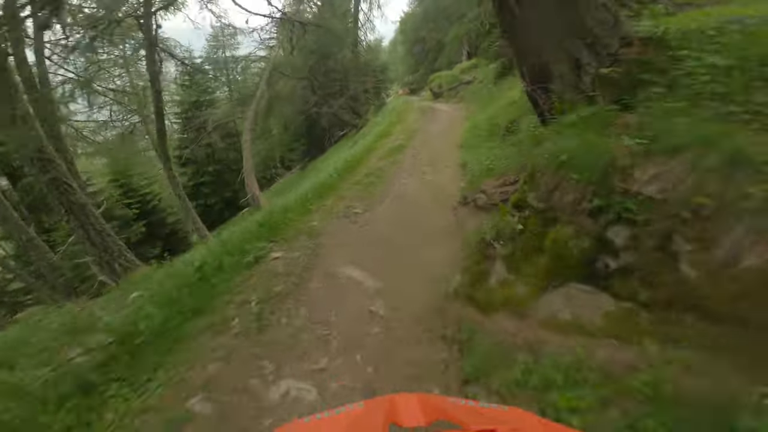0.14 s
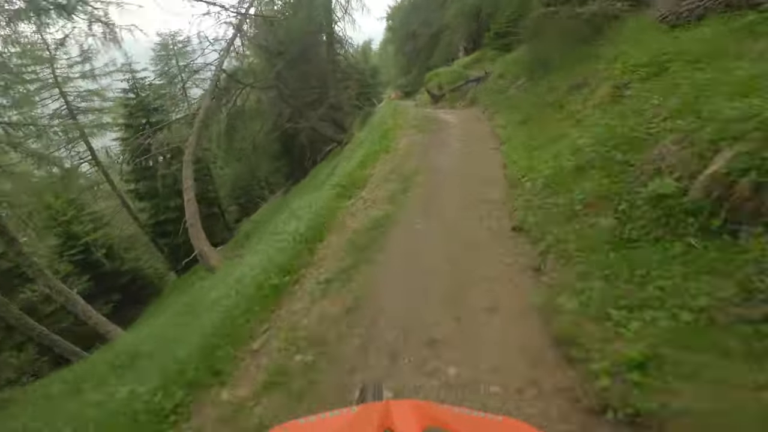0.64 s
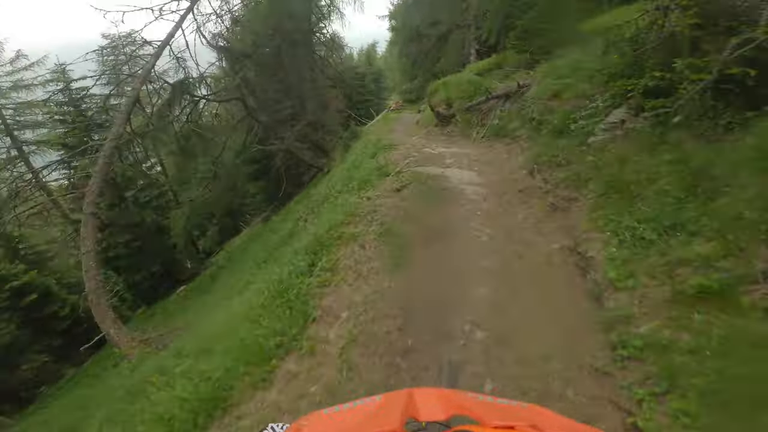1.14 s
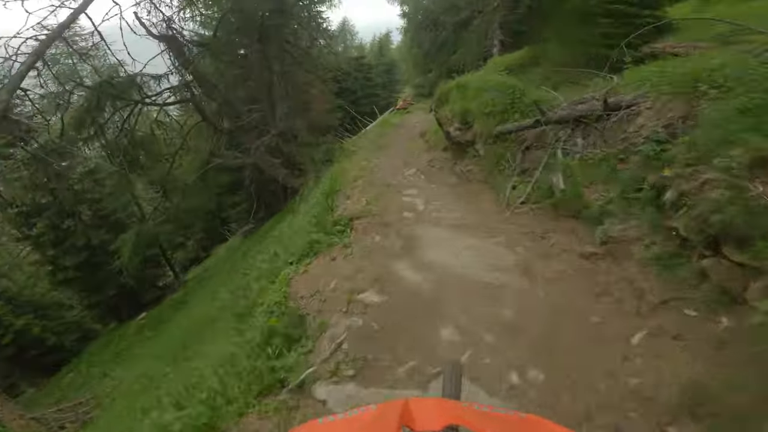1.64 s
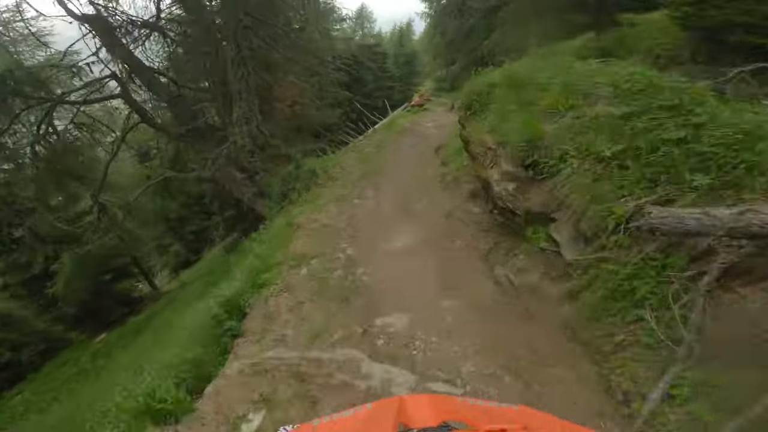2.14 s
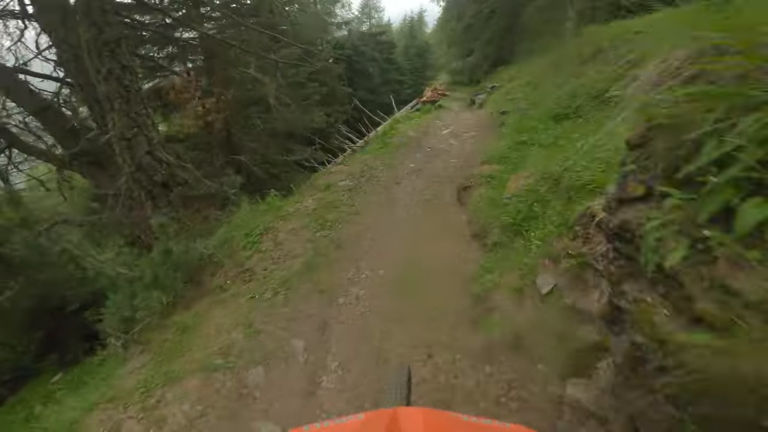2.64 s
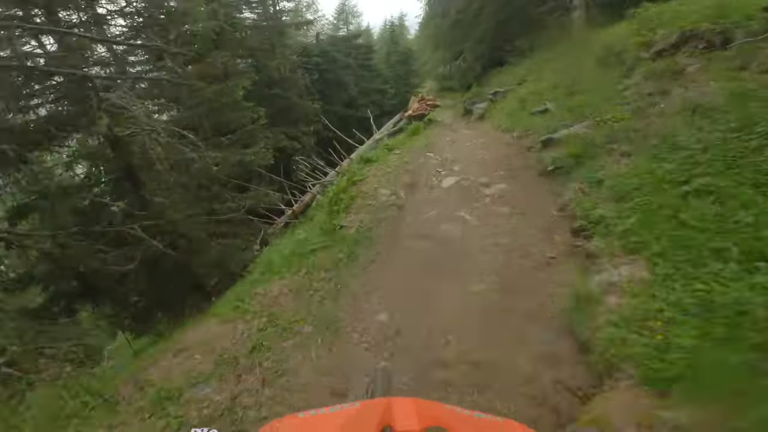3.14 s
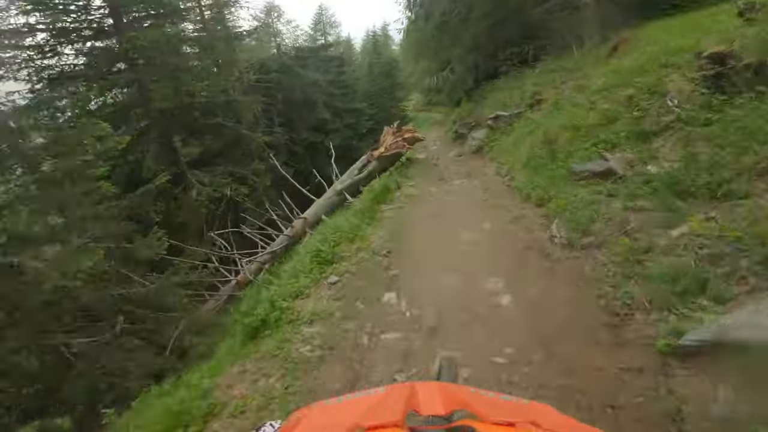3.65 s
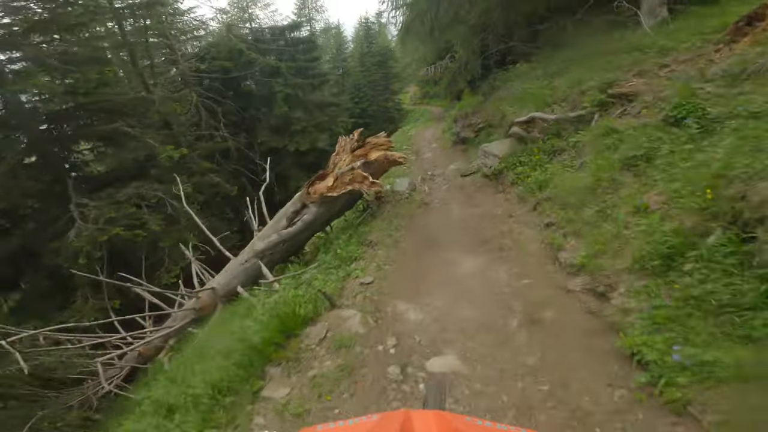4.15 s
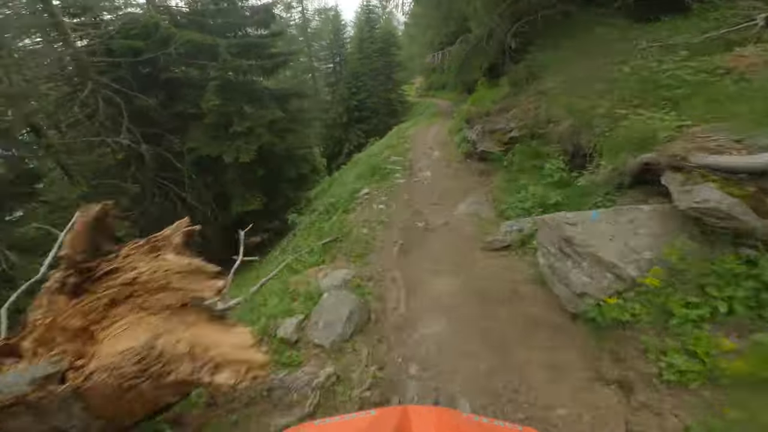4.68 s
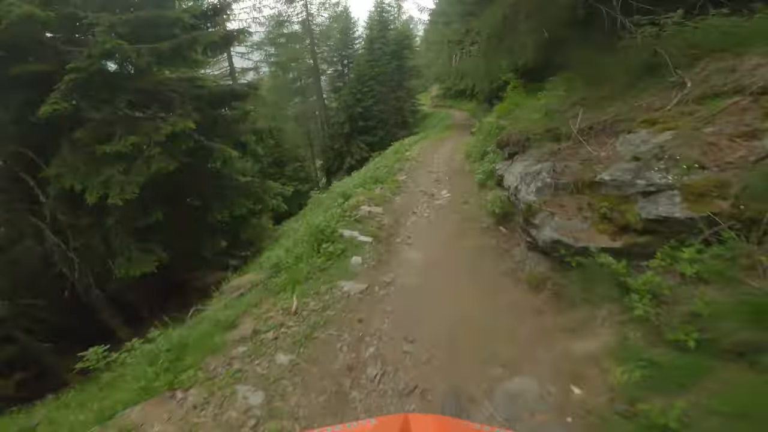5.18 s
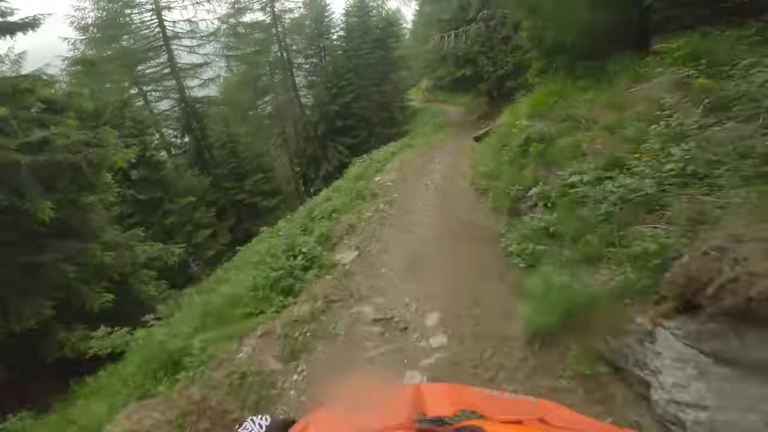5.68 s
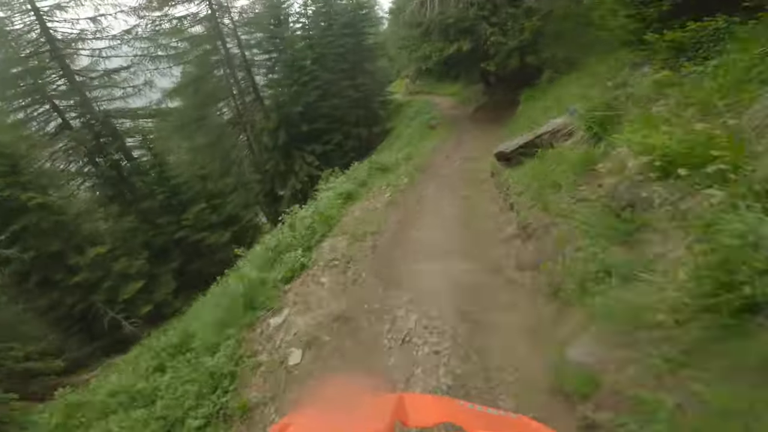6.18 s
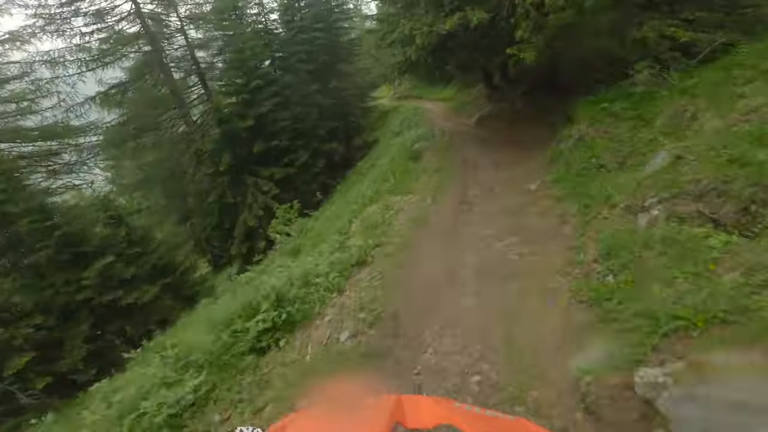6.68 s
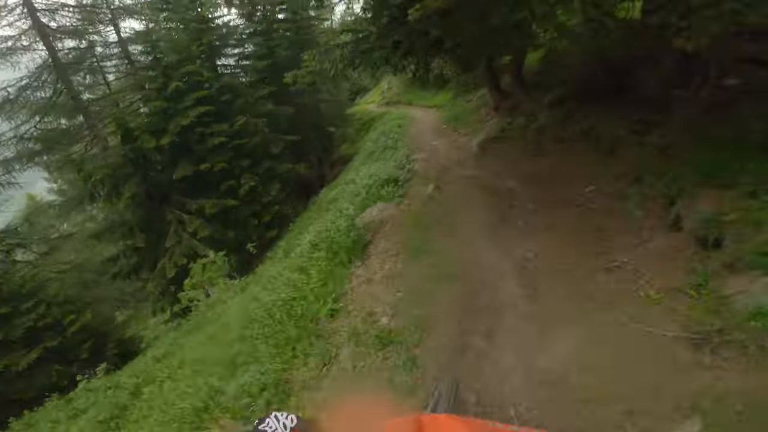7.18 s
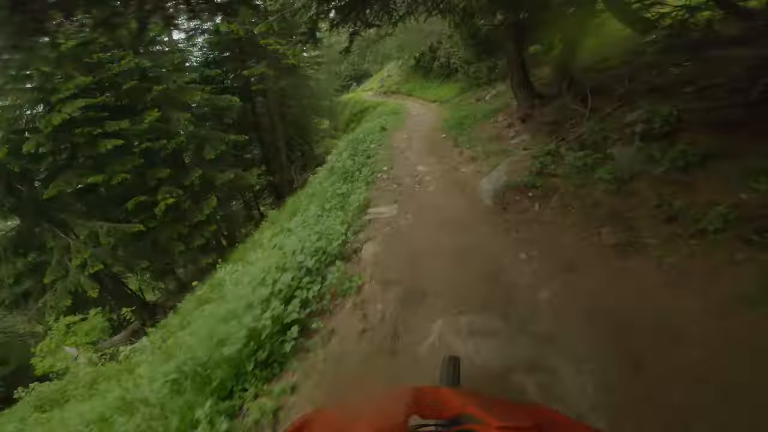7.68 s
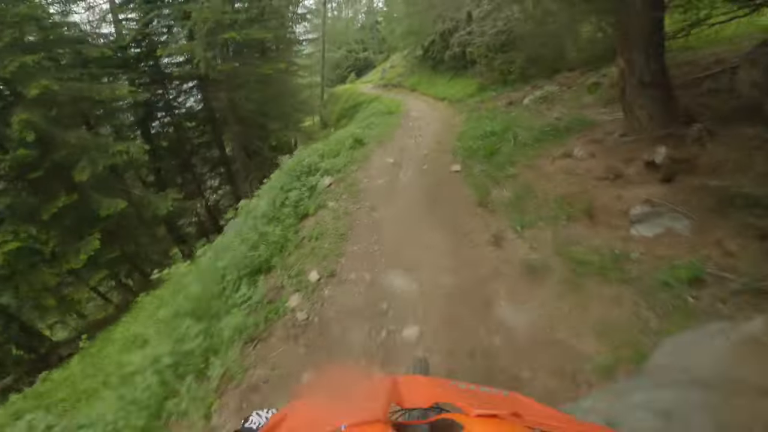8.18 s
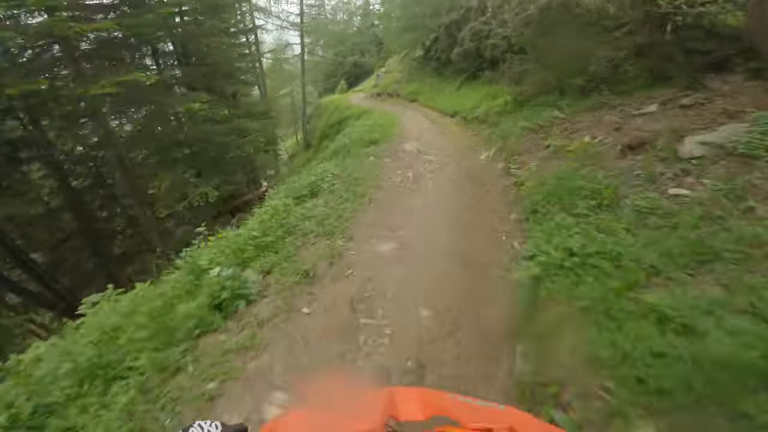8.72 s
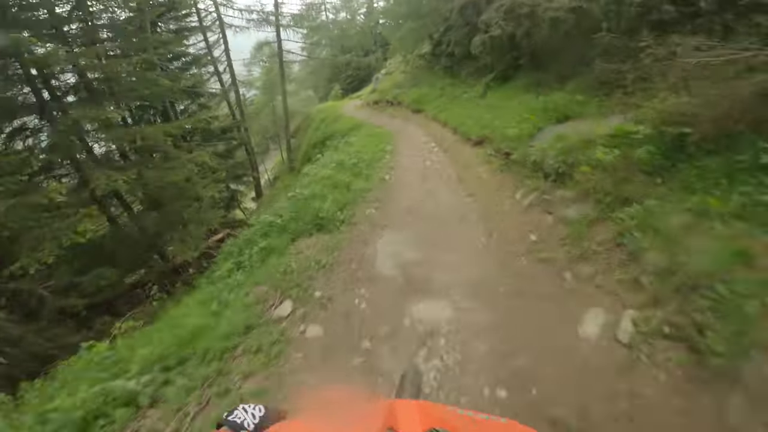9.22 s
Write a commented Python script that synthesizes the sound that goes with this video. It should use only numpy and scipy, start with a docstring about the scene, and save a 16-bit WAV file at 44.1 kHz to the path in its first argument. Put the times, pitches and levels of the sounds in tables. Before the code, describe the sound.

A mountain bike speeds down a dirt and gravel forest trail for a little over nine seconds, heard close and dry from a small microphone on the rider. Grainy tyre crunch, soft airy hiss, sand spray and deep, uneven wind rumble never stop. From 0 to 0.8 s stones knock, pebbles tick and a loose metal part chatters; about 0.9-1.4 s is smoother. From 1.5 s knocks return, crowding at 2-2.7 s with a hard rattle near 2.4. Around 3-3.9 s impacts thin while wind surges in low gusts. The densest pounding comes at 4.3-5.4 s, with hollow tocks near 4.8 and 5.3. Rattling and crunch stay strong to 6.4 s, then knocks become sparser through about 8 s. Brighter ticks and a wind buffet come near 8.5-8.7 s, then a tight run of small knocks until the end. Loud hits are briefly squashed.

```python
"""A mountain bike rolls fast down a gravel forest trail, heard from a small camera on the rider.
Stones and crunching grit shake damped modes of tyre and frame; pebbles tick as short tone bursts, and low
hollow tones sound, many within the stone knocks. A loose metal part chatters: bouncing contacts through
dull modes and a clear ring. Noise bands make the wind's rumble and a hiss, bright grains make sand;
a limiter ducks the loudest moments."""
import sys
import numpy as np
from scipy import signal
from scipy.io import wavfile
from scipy.ndimage import uniform_filter1d

SR = 44100
rng = np.random.default_rng(int(sys.argv[2]) if len(sys.argv) > 2 else 0)


def to_wav(sig):
    """Store sig (one row per channel, or 1-D mono) as 16-bit WAV at the path in sys.argv[1].

    Samples outside -1..1 are clipped; the rate is SR.
    """
    pcm = np.clip(np.atleast_2d(sig), -1, 1) * 32767
    pcm = np.round(pcm).astype(np.int16)
    wavfile.write(sys.argv[1], SR, pcm.T)  # frames by channels


def gain_from_decibels(decibels):
    """Convert decibel values to linear amplitude factors."""
    exponent = np.asarray(decibels, float) / 20
    return 10 ** exponent


N = 411453


def rms_one(x):
    """Normalisation: scales the mean power to 1."""
    return x / np.sqrt(np.mean(x ** 2) + 1e-20)


def filtered(x, order, hz, kind="low"):
    """Butterworth filtering: a flat pass band with smooth skirts."""
    return signal.sosfilt(signal.butter(order, hz, kind, fs=SR, output="sos"), x)


def drift(rate_hz):
    """Low-passed random process: noise through two equal poles at rate_hz; rms 1."""
    pole = np.exp(-40 * np.pi * rate_hz / SR)   # computed at every 20th sample
    noise = rng.standard_normal(N // 20 + 4002)
    slow = signal.lfilter([1], [1, -2 * pole, pole * pole], noise)[4000:]   # past the onset
    return np.interp(np.arange(N) / 20, np.arange(len(slow)), rms_one(slow))


def resonance(x, hz, width_hz):
    """Damped oscillator: a pole pair that a unit click sets ringing with height near 1."""
    radius, angle = np.exp(-np.pi * width_hz / SR), 2 * np.pi * hz / SR
    poles = [1, -2 * radius * np.cos(angle), radius * radius]
    return signal.lfilter([1, 0, -1], poles, x + 1e-18) / 2


def grains(per_s, spread_db, soft_hz):
    """Random impulse process: clicks of long-tailed size, rms 1 before soft contact dulls them."""
    size_db = spread_db * np.minimum(rng.exponential(1, N), 3)
    sizes = gain_from_decibels(size_db) * rng.choice([-1, 1], N)
    clicks = rms_one(sizes * (rng.random(N) < per_s / SR))
    return filtered(clicks, 3, np.clip(soft_hz, 500, 16000))


def banded_noise(spectrum, patchy_db, rate_hz):
    """Modulated noise: half-octave bands flicker partly together, partly alone; rms 1."""
    hz, db = np.transpose(spectrum)
    octaves = np.arange(0, np.log2(hz[-1] / hz[0]) + .5, .5)
    edges = np.minimum(hz[0] * 2 ** octaves, .45 * SR)
    out, together, white = 0, drift(rate_hz), rng.standard_normal((2, N))
    for k, (low, high) in enumerate(zip(edges, edges[1:])):
        band = filtered(white[k % 2], 2, [low, high], "band")   # neighbours use separate noises
        level_db = np.interp(np.log(low * high) / 2, np.log(hz), db)
        flicker_db = patchy_db * (1.4 * together + drift(rate_hz))
        out = out + band * gain_from_decibels(level_db + flicker_db)
    return rms_one(out)


def jolts(times, level_db, lengths_s, rise_s, squareness):
    """Transient envelope: linear rise times a stretched-exponential decay, cut after 0.12 s."""
    out, t = np.zeros(N), np.arange(round(.12 * SR)) / SR
    for s, db, length in np.broadcast(times, level_db, lengths_s):
        at = round(s * SR)
        decay = np.exp(-(t / np.clip(length, .002, .05)) ** squareness)
        shape = np.minimum(t / rise_s, 1) * decay
        out[at:at + len(t)] += gain_from_decibels(db) * shape[:N - at]
    return out


def ticks(times, level_db, pitch_hz, cycles):
    """Damped tone burst: the envelope peaks after a fifth of its cycles, then dies away."""
    out, t = np.zeros(N + SR), np.arange(round(.02 * SR)) / SR
    for s, db, hz in np.broadcast(times, level_db, pitch_hz):
        age = 5 * t * hz / cycles
        at = round(s * SR)
        out[at:at + len(t)] += gain_from_decibels(db) * age * np.exp(1 - age) * np.sin(2 * np.pi * hz * t)
    return out[:N]


def scattered(per_s, level_db, rough_db):
    """Random arrivals: uniform times, levels spread by 4 dB either way and raised by rough ground."""
    when, size = rng.random((round(per_s * N / SR), 2)).T
    s = when * (N - 1) / SR
    return s, level_db + rough_db[(s * SR).astype(int)] + 8 * (size - .5)


# relative spectral density of the hiss: pitch_hz [Hz], level_db [dB per Hz]
HISS_SPECTRUM = [(1650, -4), (2800, -0.5), (4070, 7), (4810, 15.5), (6200, 4.5), (7600, -7), (8410, -26),
                 (9200, -26), (9760, -42), (11600, -33), (15100, -46), (22000, -120)]
HISS_EDGE_HZ = 7500
HISS_DB, HISS_FOLLOWS = -47.5, 0.28   # gain at mean roughness; dB per dB of roughness


def air_hiss(rough_db):
    """Shaped noise: a smooth hiss, stepping down above its edge and stronger on rough ground."""
    hiss = banded_noise(HISS_SPECTRUM, patchy_db=.4, rate_hz=25)
    dull = filtered(hiss, 6, HISS_EDGE_HZ)
    return gain_from_decibels(HISS_DB + HISS_FOLLOWS * rough_db) * (0.78 * dull + 0.44 * hiss)


# relative spectral density of the wind rumble: pitch_hz [Hz], level_db [dB per Hz]
WIND_SPECTRUM = [(12, -30), (20, 1.5), (48, 4), (83, 0), (127, -2), (200, -12), (349, -26.5), (600, -22),
                 (780, -27.5), (1320, -120)]
# rms level of the buffeting, the upper half of the rumble: start_s [s], level_db [dB]
BUFFETING = [(0.0, -27.5), (1.87, -30), (2.23, -27), (2.28, -22.5), (3.4, -30.5), (3.43, -26.5),
             (4.49, -23), (4.6, -33), (4.81, -22), (6.21, -22.5), (6.31, -26.5), (6.91, -28), (7.04, -31),
             (7.87, -24.5), (8.47, -30), (8.52, -19), (8.58, -24.5), (9.02, -23), (9.09, -28),
             (9.33, -25.5)]
SPLIT_HZ = 75   # between deep rumble and buffeting


def wind(wind_db, flutter_db):
    """Turbulent pressure: eddies press on the microphone port as rumble, buffeting and flutter."""
    rumble = banded_noise(WIND_SPECTRUM, patchy_db=1.0, rate_hz=8.7)
    deep = rms_one(filtered(rumble, 4, SPLIT_HZ))
    upper = rms_one(filtered(rumble, 4, SPLIT_HZ, "high"))
    s, db = np.transpose(BUFFETING)
    buffet_db = np.interp(np.arange(N) / SR, s, db)
    flutter = resonance(resonance(rng.standard_normal(N), 200, 137), 247, 500)
    flutter = rms_one(flutter * gain_from_decibels(3.1 * drift(24.6)))
    return gain_from_decibels(wind_db - 3.5) * deep + gain_from_decibels(buffet_db) * upper + gain_from_decibels(flutter_db) * flutter


# fine grit snapping against the frame: start_s [s], level_db [dB, before the lift in fine_grit]
SNAPS_OF_GRIT = [(0.3919, -61), (1.6525, -57), (1.7149, -57), (2.3525, -55), (2.369, -41), (2.5959, -53),
                 (3.4649, -53), (3.703, -58), (3.9773, -52), (4.9645, -52), (5.0109, -52), (5.3746, -51),
                 (7.2423, -54), (8.114, -50), (8.1283, -46), (8.707, -51)]
SNAP_LOW_HZ, SNAP_HIGH_HZ, SNAP_S = 6000, 12000, 0.003
SPRAY_DB, SPRAY_FOLLOWS = -59, 0.54   # rms at mean roughness; dB per dB of roughness
SPRAY_LOW_HZ, SPRAY_HIGH_HZ = 3200, 6700


def fine_grit(rough_db):
    """Granular noise: many tiny impacts merge into sand spray, single grains snap brightly."""
    s, db = np.transpose(SNAPS_OF_GRIT)
    bursts = jolts(s, db + 8.0, SNAP_S, rise_s=0.00026, squareness=1.3)
    snaps = filtered(rng.standard_normal(N) * bursts, 2, [SNAP_LOW_HZ, SNAP_HIGH_HZ], "band")
    sand = grains(4000, spread_db=3.5, soft_hz=12300) * gain_from_decibels(3.1 * drift(15))
    sand = rms_one(filtered(sand, 1, [SPRAY_LOW_HZ, SPRAY_HIGH_HZ], "band"))
    return snaps + gain_from_decibels(SPRAY_DB + SPRAY_FOLLOWS * rough_db) * sand


# loose part thrown about: start_s [s], level_db [nominal peak dB], ring_db [dB against the clatter]
RATTLES_OF_PART = [(0.017, -16, -26), (0.068, -20.5, -24), (0.1166, -20, -30), (0.228, -17.5, -24),
                   (0.461, -18, -20), (0.5062, -29, -20), (0.6675, -23, -25), (0.7937, -22, -29),
                   (0.931, -20.5, -42), (0.997, -25.5, -36), (1.276, -25.5, -24), (1.3359, -18, -22),
                   (1.3997, -22.5, -30), (1.5454, -25, -17), (1.6621, -28, -18), (1.763, -26.5, -17),
                   (1.888, -21, -22), (1.955, -18.5, -25), (2.0485, -15.5, -29), (2.1011, -24, -28),
                   (2.1395, -24, -39), (2.2388, -29, -21), (2.2692, -22.5, -19), (2.369, -8.5, -29),
                   (2.406, -20, -28), (2.501, -19, -26), (2.5521, -16, -20), (2.633, -12.5, -26),
                   (2.7313, -25, -25), (2.8265, -23.5, -20), (2.8928, -22.5, -19), (3.0102, -24, -18),
                   (3.382, -24.5, -19), (3.4634, -19.5, -28), (3.516, -19.5, -17.5), (3.6027, -24, -18),
                   (3.8505, -18, -24), (3.9744, -22, -26), (4.0267, -20.5, -21), (4.159, -22.5, -29),
                   (4.2787, -21, -24), (4.3765, -20, -20), (4.4475, -23, -21), (4.598, -25, -24),
                   (4.7102, -21, -21), (4.808, -18, -27), (4.884, -21.5, -20), (4.9647, -27, -15),
                   (5.011, -20, -25), (5.0876, -19, -24), (5.1706, -28, -20), (5.239, -18, -28),
                   (5.3243, -34, -10), (5.3732, -18, -26), (5.4226, -25, -26), (5.4585, -23, -18),
                   (5.6316, -24, -20), (5.754, -21.5, -20), (5.8144, -20, -29), (5.9444, -22, -28),
                   (5.9843, -23, -31), (6.0884, -17, -26), (6.181, -15.5, -27), (6.2891, -33, -19),
                   (6.377, -24.5, -44), (6.3924, -24, -19), (6.4398, -36, -17), (6.517, -24, -23),
                   (6.592, -30, -29), (6.635, -27, -32), (6.668, -35, -35), (6.729, -26, -19),
                   (6.782, -29, -21), (6.872, -33, -24), (7.0274, -20.5, -21), (7.0728, -29, -18),
                   (7.1242, -25, -38), (7.2045, -24, -48), (7.2429, -27, -13), (7.31, -24, -29),
                   (7.671, -21, -23), (7.73, -30, -16), (7.777, -28, -27), (7.992, -23, -30),
                   (8.0755, -21.5, -30), (8.1115, -29, -23), (8.164, -17.5, -34), (8.323, -20, -38),
                   (8.3928, -23.5, -21), (8.455, -16.5, -27), (8.575, -18.5, -32), (8.6477, -24, -25),
                   (8.6936, -19, -33), (8.714, -21, -18), (8.7465, -26, -25), (8.85, -26, -30),
                   (8.9206, -22, -21), (9.005, -21.5, -28), (9.0608, -32, -13), (9.105, -23.5, -25),
                   (9.1463, -22, -26), (9.187, -29, -21), (9.2542, -24.5, -27)]
# its dull damped modes: pitch_hz [Hz], width_hz [Hz], level_db [dB]
CLATTER_MODES = [(3180, 2250, -1.5), (4690, 820, -8.5), (6630, 2000, -22.5), (7700, 4400, -32)]
# its faint upper rings: pitch_hz [Hz], width_hz [Hz], level_db [dB against the clear mode]
UPPER_RINGS = [(10700, 330, -17), (13300, 300, -17), (15060, 150, -8)]
RING_HZ, RING_T60_S = 8970, 0.017   # its one clear mode
RATTLE_CONTACT_DB = -14.5   # one bounce against the peak of the rattle
SMALL_RATTLES_PER_S, SMALL_RATTLE_DB, SMALL_RATTLE_RING_DB = 4.6, -30, -28


def loose_part(rough_db):
    """Impact excitation: sharp bounces after each bump drive dull modes and clear rings."""
    small = scattered(SMALL_RATTLES_PER_S, SMALL_RATTLE_DB, rough_db)
    small = np.broadcast_arrays(*small, SMALL_RATTLE_RING_DB)
    s, peak_db, ring_db = np.hstack([np.transpose(RATTLES_OF_PART), small])
    contact_db = peak_db + RATTLE_CONTACT_DB
    bounces, out = grains(5000, spread_db=8.0, soft_hz=6940), 0
    for hz, width, db in CLATTER_MODES:
        strength_db = contact_db + db + rng.normal(0, 0.36, len(s))
        shaking = jolts(s, strength_db, 0.011, rise_s=0.0032, squareness=0.94)
        once = resonance(bounces * shaking, hz, width)
        # a second resonance keeps the skirts dark
        out = out + resonance(once, hz, 3 * width) * 3 * width * 2 * np.pi / SR
    shaken = jolts(s, contact_db + ring_db, 0.013, rise_s=.002, squareness=1.6)
    struck = grains(3400, spread_db=2.5, soft_hz=15000) * shaken
    for hz, width, db in UPPER_RINGS:
        twice = resonance(resonance(struck, hz, 3 * width), hz, width)
        out = out + gain_from_decibels(db) * twice * 6 * np.pi * width / SR
    narrow = resonance(struck, RING_HZ, 1220) * 700 * 2 * np.pi / SR
    ring_width_hz = np.log(1000) / np.pi / RING_T60_S
    return out + resonance(narrow, RING_HZ, ring_width_hz)


# pebbles flung against the frame: start_s [s], level_db [nominal peak dB], pitch_hz [Hz]
FLUNG_PEBBLES = [(0.0164, -15, 2160), (0.238, -21, 2500), (0.3398, -17.5, 2620), (0.6468, -20, 2540),
                 (0.774, -21, 2200), (0.9857, -22, 2380), (1.387, -17, 2340), (1.9018, -19.5, 2890),
                 (1.941, -21, 2340), (2.413, -24, 3200), (2.4835, -23, 4000), (2.489, -23, 4000),
                 (2.544, -26, 2600), (2.553, -27, 3000), (2.566, -20, 3700), (2.589, -17, 3000),
                 (2.642, -15, 2940), (2.6682, -16, 2950), (2.689, -22, 2620), (2.9562, -22, 2280),
                 (3.9797, -19, 2450), (4.16, -18.5, 2400), (4.186, -20, 2400), (4.581, -17, 2950),
                 (4.718, -14.5, 3280), (4.801, -21, 3500), (4.838, -27, 2470), (4.8706, -14.5, 3900),
                 (4.952, -22, 2370), (5.003, -26, 2050), (5.4966, -19, 2310), (5.8177, -19, 2400),
                 (5.934, -19, 2300), (6.101, -15, 2400), (6.1804, -18, 2580), (6.7103, -19, 2370),
                 (7.88, -23, 2990), (7.9925, -20.5, 1970), (8.3724, -18, 2510), (8.5565, -21, 2880),
                 (8.6955, -15, 3920), (9.14, -20, 2490)]
# low hollow tones, many sounding within the stone knocks:
# start_s [s], level_db [nominal peak dB], pitch_hz [Hz]
HOLLOW_TONES = [(0.195, -21, 734), (1.507, -15.5, 840), (1.881, -21, 1220), (2.005, -21.5, 810),
                (2.259, -15.5, 1100), (4.555, -18, 980), (4.802, -11, 990), (4.868, -22, 930),
                (5.325, -12, 980), (6.075, -18, 1350), (6.446, -12, 1020), (6.455, -18, 805),
                (7.429, -29, 1150), (8.948, -20, 1100)]
PEBBLE_CYCLES, HOLLOW_CYCLES = 6.1, 7.6
GRIT_PER_S, GRIT_DB, GRIT_LOW_HZ, GRIT_HIGH_HZ = 45, -28, 1100, 3900   # the small ones between


def pebbles(rough_db):
    """Tone bursts of single impacts: each pebble ticks at its own pitch."""
    s, db = scattered(GRIT_PER_S, GRIT_DB, rough_db)
    pitch_hz = GRIT_LOW_HZ * (GRIT_HIGH_HZ / GRIT_LOW_HZ) ** rng.random(len(s))
    flung = np.hstack([np.transpose(FLUNG_PEBBLES), [s, db, pitch_hz]])
    hollow = ticks(*np.transpose(HOLLOW_TONES), cycles=HOLLOW_CYCLES)   # lower and longer
    return ticks(*flung, cycles=PEBBLE_CYCLES) + hollow


# modes of tyre and frame, also struck by the stones: pitch_hz [Hz], width_hz [Hz], level_db [dB]
BIKE_MODES = [(232, 175, -3), (479, 122, -9.5), (833, 365, 0.5), (1155, 450, 2.5), (1590, 620, 0),
              (2253, 453, 1), (3100, 790, -13), (3900, 640, -22)]


def tyres(crunch_db):
    """Modal filtering: grit cracks in clumps under the knobs and sounds through tyre and frame."""
    clumps = gain_from_decibels(1.83 * drift(23.0) + 1.8 * drift(57))
    cracks = grains(250, spread_db=2.0, soft_hz=3000)   # bigger grit shakes all modes at once
    crunch = 0
    for hz, width, db in BIKE_MODES[1:]:   # without the lowest mode
        fine = grains(2500, spread_db=5.5, soft_hz=3500)
        mode = resonance(0.53 * cracks + fine, hz, width)
        crunch = crunch + gain_from_decibels(db + 0.92 * drift(15.0)) * mode
    dulled = filtered(clumps * crunch, 3, 5000)   # rubber dulls the top
    return gain_from_decibels(crunch_db) * rms_one(dulled)


# stones struck: start_s [s], level_db [nominal peak dB], upper_db [upper modes, dB against lower],
# length_s [s, held to at most 0.05 in the jolt]
STONE_KNOCKS = [(0.129, -16, 4, 0.009), (0.198, -13.5, -34, 0.0094), (0.273, -16, -15, 0.013),
                (0.456, -17, 12, 0.0054), (0.594, -25.5, 11, 0.026), (0.666, -31, 16, 0.038),
                (1.504, -15, -5, 0.044), (1.582, -13, -6, 0.021), (1.812, -14, -22, 0.0092),
                (1.883, -19, -11, 0.019), (1.942, -21, 11, 0.014), (2.003, -8, -37, 0.0051),
                (2.115, -15, -12, 0.007), (2.182, -14.5, 5, 0.018), (2.26, -12.5, -5, 0.016),
                (2.349, -15, -16, 0.012), (2.369, -14, -6, 0.033), (2.441, -14.5, -27, 0.055),
                (2.513, -21, -13, 0.021), (2.541, -11.5, -17, 0.024), (2.626, -16.5, -12, 0.027),
                (2.764, -19, -7, 0.0085), (3.095, -20, -2, 0.013), (3.316, -14, -24, 0.0066),
                (3.916, -17, -11, 0.0051), (4.115, -15, -16, 0.014), (4.263, -19.5, -5, 0.012),
                (4.364, -14, -5, 0.016), (4.439, -12, -27, 0.012), (4.52, -13, -17, 0.0088),
                (4.554, -13.5, -21, 0.012), (4.576, -17.5, -2, 0.014), (4.59, -20, -5, 0.027),
                (4.624, -15.5, -11, 0.016), (4.665, -16, -10, 0.0065), (4.696, -14, -35, 0.02),
                (4.8, -8, -16, 0.0095), (4.869, -13.5, 4, 0.017), (4.953, -15, 0, 0.0062),
                (5.083, -16, -9, 0.01), (5.214, -15, -61, 0.037), (5.246, -11, -9, 0.008),
                (5.305, -13, 5, 0.0058), (5.322, -10.5, -42, 0.039), (5.622, -19.5, 7, 0.015),
                (5.676, -15.5, -7, 0.0091), (5.752, -16.5, -6, 0.015), (5.879, -15, 6, 0.0053),
                (5.937, -18.5, -21, 0.0051), (5.979, -12, -15, 0.012), (6.079, -21, 8, 0.009),
                (6.287, -19, 9, 0.036), (6.375, -16, -3, 0.014), (6.444, -16, -34, 0.021),
                (7.019, -16.5, 3, 0.017), (7.18, -15.5, -8, 0.035), (7.515, -21.5, 13, 0.011),
                (8.069, -20.5, 2, 0.007), (8.114, -14, -52, 0.046), (8.643, -27.5, 12.5, 0.022),
                (8.693, -25, 21, 0.02), (8.864, -23, 0, 0.016), (8.91, -19, 9, 0.017),
                (8.95, -20.5, -17, 0.012), (8.991, -24, 4, 0.026), (9.024, -18, 2, 0.0036),
                (9.041, -22.5, -2, 0.028), (9.086, -16.5, -1, 0.0081), (9.13, -15, -10, 0.013),
                (9.179, -17.5, -2, 0.025)]
KNOCK_CONTACT_DB = -23.5   # one contact of the flurry against the peak of the knock
SMALL_STONES_PER_S, SMALL_STONE_DB, SMALL_STONE_UPPER_DB, SMALL_STONE_S = 3.9, -25, 5, 0.013
FIRST_TOUCH_DB, FIRST_TOUCH_HZ = -2, 2400   # the opening tick; dB before brightness and length act
TOUCH_LOSS_DB_PER_S = 300   # long grinding knocks open more softly


def stones(rough_db):
    """Modal excitation: each stone's flurry of contacts drives every mode of the bike differently."""
    small = scattered(SMALL_STONES_PER_S, SMALL_STONE_DB, rough_db)
    small = np.broadcast_arrays(*small, SMALL_STONE_UPPER_DB, SMALL_STONE_S)
    s, peak_db, upper_db, length_s = np.hstack([np.transpose(STONE_KNOCKS), small])
    touch_db = peak_db + 0.54 * upper_db + FIRST_TOUCH_DB - TOUCH_LOSS_DB_PER_S * length_s
    out = ticks(s + 0.001495, touch_db, FIRST_TOUCH_HZ, PEBBLE_CYCLES)
    for hz, width, db in BIKE_MODES:
        upper = np.clip(np.log2(hz / 800) / 2.0, 0, 1)   # share of the knock's brightness in this mode
        strength_db = peak_db + KNOCK_CONTACT_DB + db + upper * upper_db
        strength_db = strength_db + rng.normal(0, 2.84, len(s))
        contacts = grains(5000, spread_db=2.5, soft_hz=4300)
        shaking = jolts(s, strength_db, length_s, rise_s=0.0011, squareness=1.6)
        out = out + resonance(contacts * shaking, hz, width)
    return out


# the ride: start_s [s], wind_db [deep rumble, dB before a 3.5 dB cut in wind],
# flutter_db [rms dB of the wind's flutter], crunch_db [rms dB of tyre crunch, the ground's roughness]
RIDE_LEVELS = [(0.0, -22.5, -32, -29.5), (0.9, -23, -35.5, -34), (1.08, -27.5, -33.5, -36.5),
               (1.42, -26.5, -37, -34.5), (1.5, -27, -35, -34), (2.06, -27, -39, -35), (2.3, -19, -40, -32),
               (2.38, -18, -30.5, -29.5), (2.66, -18, -35, -30), (2.74, -28.5, -31.5, -39.5),
               (3.01, -11.5, -36, -36.5), (3.06, -31, -47, -35.5), (3.21, -10, -39, -31),
               (3.23, -31, -38, -33), (3.61, -15, -46.5, -35), (4.54, -19.5, -44, -32.5),
               (4.66, -22, -35, -34.5), (5.24, -22.5, -30, -29.5), (5.66, -17.5, -40, -32.5),
               (6.14, -19.5, -34, -28), (6.99, -19.5, -37.5, -33), (7.47, -22, -41.5, -32),
               (7.76, -18, -48, -34), (8.02, -22, -45, -38.5), (8.27, -20.5, -33, -31.5),
               (8.72, -19, -33, -31), (9.0, -19.5, -45, -36)]


def scene():
    """Superposition: all sources add at one microphone, dry, in open air."""
    s, *columns = np.transpose(RIDE_LEVELS)
    wind_db, flutter_db, crunch_db = [np.interp(np.arange(N) / SR, s, c) for c in columns]
    rough_db = crunch_db - crunch_db.mean()
    background = air_hiss(rough_db) + wind(wind_db, flutter_db)
    impacts = fine_grit(rough_db) + loose_part(rough_db) + pebbles(rough_db) + stones(rough_db)
    return (background + tyres(crunch_db) + impacts)[None]


def roll_off(x):
    """The treble ends steeply here."""
    return signal.sosfilt(signal.butter(12, 15400, fs=SR, output="sos"), x)


def record(dry):
    """Dynamic compression: a limiter ducks peaks over its threshold; the microphone's top rolls off."""
    over_db = np.maximum(20 * np.log10(np.abs(dry[0]) + 1e-9) + 11.65, 0)   # threshold -11.65 dB
    slope_db = 150 * np.arange(N) / SR   # the held excess falls by 150 dB per second
    held_db = np.maximum.accumulate(over_db + slope_db) - slope_db
    ducked = dry * gain_from_decibels(-.7 * uniform_filter1d(held_db, size=132))   # smoothed over 3 ms
    return roll_off(filtered(ducked, 3, 10500))


dry = scene()
out = record(dry)
to_wav(out)
```